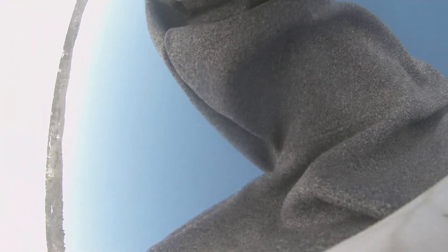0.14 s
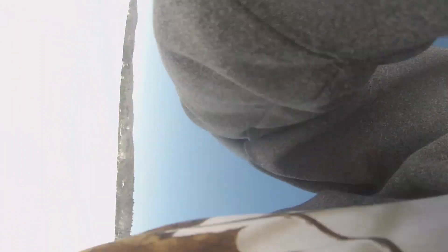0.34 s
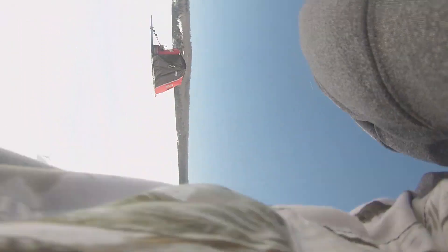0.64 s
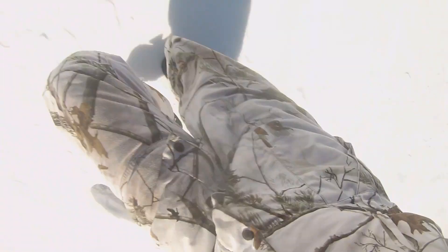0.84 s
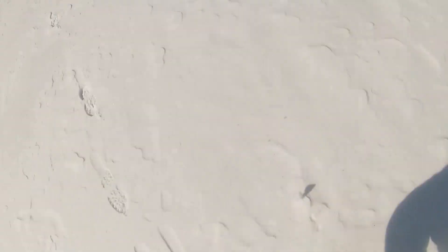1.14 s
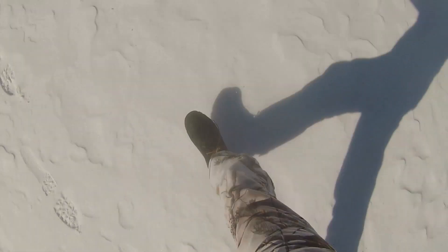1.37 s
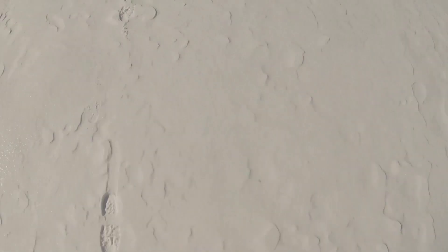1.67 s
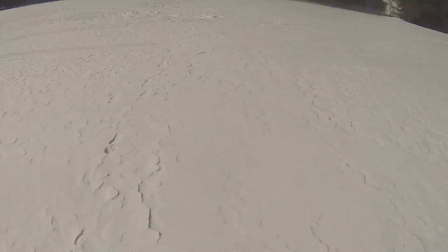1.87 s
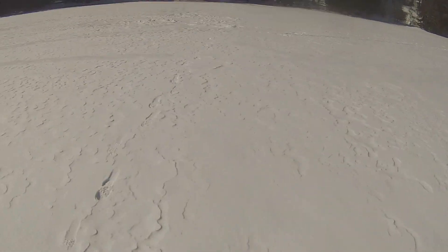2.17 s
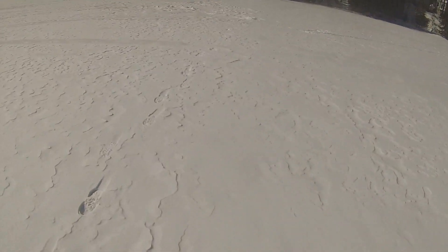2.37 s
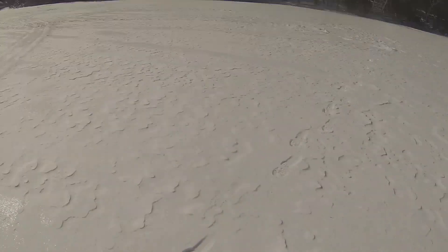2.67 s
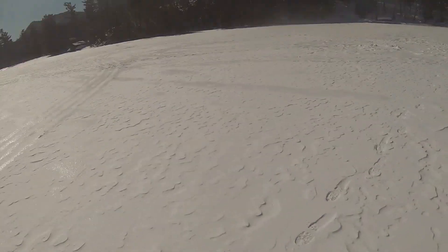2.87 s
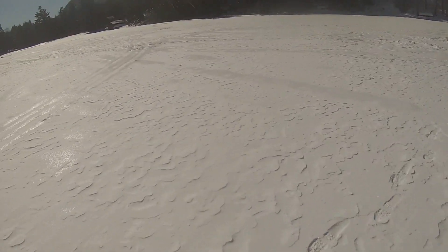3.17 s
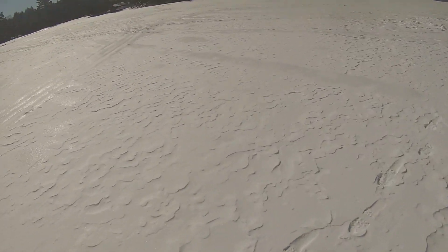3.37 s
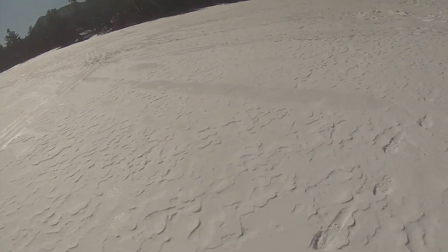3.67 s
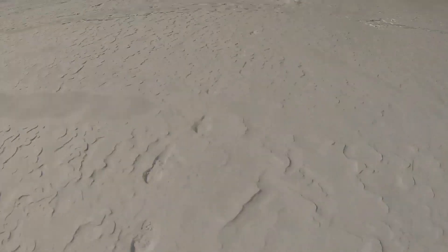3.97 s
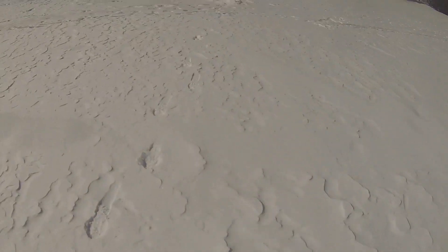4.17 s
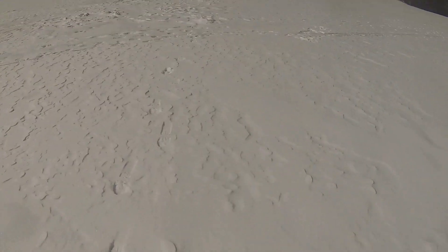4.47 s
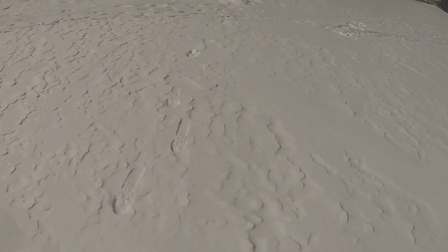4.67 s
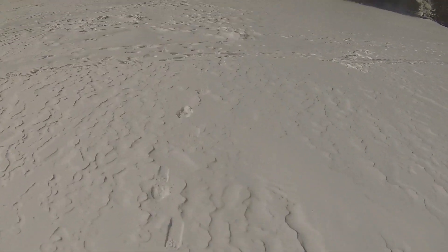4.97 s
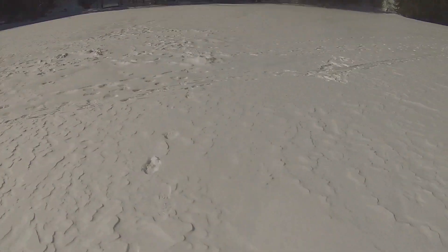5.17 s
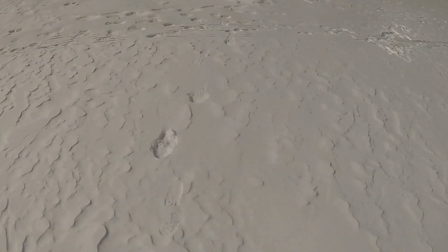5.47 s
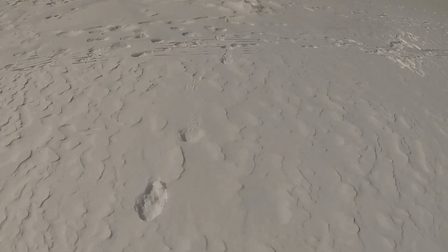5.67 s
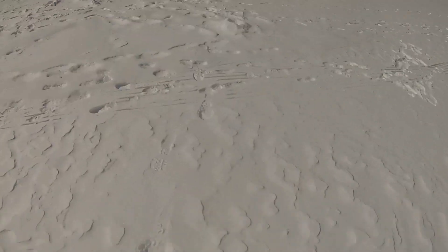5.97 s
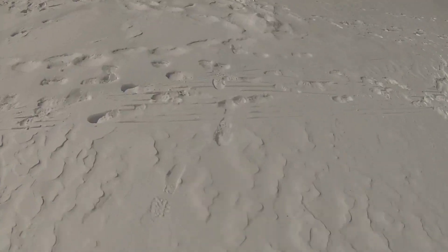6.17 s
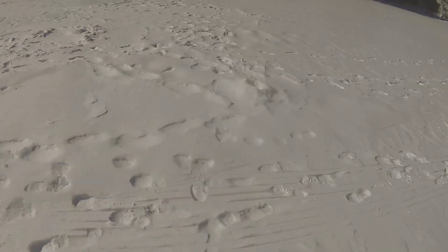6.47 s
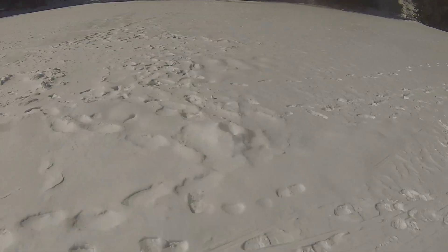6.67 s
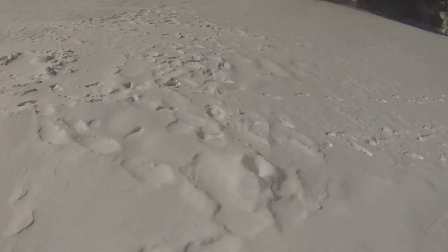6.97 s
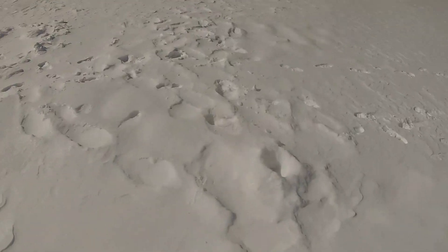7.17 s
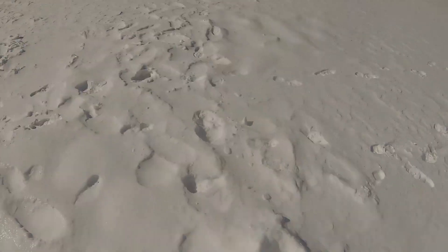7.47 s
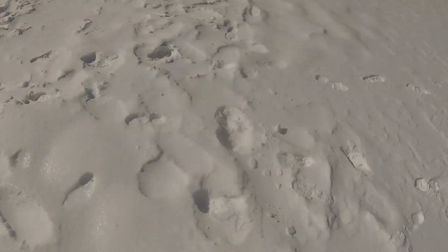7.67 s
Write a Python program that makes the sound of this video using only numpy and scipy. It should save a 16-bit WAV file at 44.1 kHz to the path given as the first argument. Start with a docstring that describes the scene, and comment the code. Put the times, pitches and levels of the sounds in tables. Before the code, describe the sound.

From 0 to about 1.9 seconds a camera is turned in the hand against a jacket: loud, close cloth rasps in short irregular strokes, boxy low-mid knocks at 0.25, 0.65 to 0.85, 1.1 and 1.5, and dry snaps, the sharpest at 0.9. A last knot of rubs and clicks comes at 1.8. Then it suddenly quiets to lumpy, low wind rumble. Boots crunch crusted snow from 2.6, in clusters near 3.0 to 3.4, 3.8, a heavier thumping one at 4.1, then 4.5, 4.9, 5.3, 5.6, 6.0, 6.4, 6.8, 7.2 and 7.5. Each is a few brittle breaks with fine crackle, settling grains and a muffled knock. Soft clothing swishes fall between. The rumble gusts and drops briefly nearly every stride, notably at 4.0, and swells near 7.6. Faint steady hiss and stray high ticks remain throughout, in dry open air.

```python
"""Cloth rasps over a hard camera case above a lumpy low rumble, and jolts knock the case, low and boxy.
The camera is turned in the hand against a jacket, then carried over crusted snow: boots crunch, clothes swish.
Clumped noise and clicks drive rasp, fizz, crackle and the modes of the case; knocks are decaying sines.
Snaps are short noise bursts, ticks are shorter still; wind and grip are slowly gusting low noise.
A faint steady hiss lies beneath."""
import sys
import numpy as np
from scipy import signal
from scipy.fft import rfft, irfft
from scipy.io import wavfile
from scipy.ndimage import uniform_filter1d

SR = 44100
rng = np.random.default_rng(int(sys.argv[2]) if len(sys.argv) > 2 else 0)


def rack_gain(trim_db):
    """Turn a fader trim in dB into the linear factor to multiply a signal by."""
    fader = np.asarray(trim_db, float)
    return 10 ** (fader / 20)


def store_pcm(level_fs):
    """Save levels as 16-bit WAV."""
    pcm = np.round(np.clip(level_fs, -1, 1) * 32767).astype(np.int16)
    wavfile.write(sys.argv[1], SR, np.atleast_2d(pcm).T)


N = 345744
WALK_S = 1.89  # rubbing in the hand gives way to the walk


def evened(x):
    """Scales to rms 1."""
    return x / np.sqrt(np.mean(x ** 2) + 1e-20)


def curve(rows, column):
    """One column of a table, joined by straight lines sample by sample."""
    table = np.array(rows)
    return np.interp(np.arange(N) / SR, table[:, 0], table[:, column])


def coloured(x, points):
    """Filters x by a curve of (Hz, dB) points, then scales it to rms 1."""
    f, db = np.transpose(points)
    hz = np.fft.rfftfreq(N, 1 / SR)
    gain_db = np.interp(np.log(hz + 1), np.log(f + 1), db, -90, -90)
    return evened(irfft(rfft(x) * rack_gain(gain_db), N))


def lumps(seconds):
    """Slow chance of rms 1 that changes about every so many seconds."""
    size = max(int(seconds * SR), 2)
    smooth = uniform_filter1d(rng.standard_normal(N), size)
    return evened(uniform_filter1d(smooth, size))


def grains(per_s, spread_db):
    """Sparse clicks of random sign, a few of them large."""
    size = rack_gain(spread_db * np.minimum(rng.exponential(1, N), 4))
    sign = rng.choice([-1, 1], N)
    return size * sign * (rng.random(N) < per_s / SR)


def ring(x, hz, width):
    """One resonance of gain 1 at its peak."""
    b, a = signal.iirpeak(hz, hz / width, SR)
    return signal.lfilter(b, a, x)


def add(mix, s, sound):
    """Mixes sound in at time s."""
    part = mix[max(round(s * SR), 0):][:len(sound)]
    part += sound[:len(part)]


# Spectrum of the low turbulence. Each row: frequency in Hz, relative density in dB per Hz.
RUMBLE_COLOUR = [(12, -47), (20, 0), (43, -3), (75, -0.5), (105, -5.5), (190, -9.5), (414, -23),
                 (506, -28.5), (600, -30.5), (780, -87), (1320, -120)]
# Wind on the case. Each row: time in seconds, level in dB before grip and lulls.
WIND = [(0.0, -33), (0.3, -32.5), (0.83, -33), (0.93, -51.5), (1.5, -57), (1.68, -57), (1.73, -36),
        (1.95, -42.5), (2.3, -39.5), (2.8, -39), (3.0, -28.5), (3.5, -40), (3.84, -28), (4.55, -31),
        (5.0, -40), (5.4, -33.5), (6.4, -35), (7.0, -32), (7.64, -26.5), (7.84, -37.5)]
# The swinging arm halts, mostly once a stride, and the rumble drops.
# Each row: centre in seconds, depth in dB, half width in seconds.
LULLS = [(0.4, 7.5, 0.23), (1.01, 9, 0.055), (1.38, 9, 0.094), (2.1, 6.5, 0.13), (2.73, 17, 0.05),
         (3.981, 35, 0.13), (4.34, 18, 0.13), (5.08, 5, 0.093), (5.811, 17, 0.16), (6.572, 16, 0.12),
         (7.34, 16, 0.13)]


def rumble():
    """Lumpy low turbulence: the wind and the tightening hand, both easing when the arm halts."""
    grip_db, grip_s = -4.5, 0.057  # hand tightening with each jostle: level over the jostle, sluggishness
    t = np.arange(N) / SR
    gusts = rack_gain(3.55 * lumps(0.016))
    lull_db = sum(db * np.maximum(1 - abs(t - s) / half, 0) for s, db, half in LULLS)
    jostle = spells(JOSTLE, bright=0, sag_db=14.0, fall_db_per_s=600)
    grip = rack_gain(grip_db) * uniform_filter1d(jostle, int(grip_s * SR))
    level = np.hypot(rack_gain(curve(WIND, column=1)), grip) * rack_gain(-lull_db)
    return level * evened(gusts * coloured(rng.standard_normal(N), RUMBLE_COLOUR))


# Rubbing as the case colours it, lent to the air too. Each row: frequency in Hz, relative density in dB per Hz.
RASP_COLOUR = [(800, -24), (1100, -7.5), (1500, 7), (2100, 4.5), (2600, 7), (3600, 7), (4200, -6),
               (4700, -7), (5700, -1), (6600, -14.5), (7600, -32), (16000, -60)]
# Fizz of the rub and of the microphone. Each row: frequency in Hz, relative density in dB per Hz.
FIZZ_COLOUR = [(4120, -9), (7000, -12), (8070, -15.5), (11900, -22), (14700, -25), (15600, -38),
               (16000, -28)]


def hiss():
    """The steady floor: air through the case and the microphone's own fizz."""
    air_db, own_db = -70, -77
    air, own = rng.standard_normal((2, N))
    return rack_gain(air_db) * coloured(air, RASP_COLOUR) + rack_gain(own_db) * coloured(own, FIZZ_COLOUR)


# Strokes of cloth, first over the case, then faint ones as the walker's clothes swish.
# Each row: start in seconds, length in seconds, jostle in dB, brightness (rasp over jostle) in dB.
STROKES = [(0.024, 0.13, -39, -2.5), (0.16, 0.094, -30, -7), (0.265, 0.048, -25.5, -11.5),
           (0.321, 0.021, -24.5, -2.5), (0.351, 0.075, -34.5, 5.5), (0.424, 0.16, -35, -0.5),
           (0.538, 0.071, -40, 7), (0.611, 0.044, -34.5, -1.5), (0.654, 0.091, -34.5, 0.5),
           (0.802, 0.04, -32.5, 1), (0.847, .055, -41.5, 3), (1.022, 0.041, -48, -8),
           (1.103, .025, -38.5, -4), (1.122, 0.037, -31, -2), (1.142, 0.06, -38.5, 0),
           (1.227, 0.0027, -30, -23), (1.235, 0.036, -40, -1), (1.311, 0.047, -35, -1),
           (1.41, 0.076, -36, -6), (1.475, 0.054, -37, -1), (1.532, 0.031, -29.5, -2),
           (1.568, 0.018, -34.5, -7), (1.622, 0.05, -39, -2), (1.67, 0.05, -40, 2.5),
           (1.705, 0.058, -31, 1), (1.78, 0.0059, -27, -16), (1.823, 0.0041, -26.5, 0),
           (1.835, 0.025, -39.5, 0.5), (1.95, 0.038, -53, -7), (2.07, 0.048, -54, -1),
           (2.33, 0.016, -51, -7), (2.79, 0.098, -48.5, -9), (2.88, 0.046, -45.5, -28),
           (3.17, 0.18, -45.5, -28), (3.57, 0.085, -46, -11.5), (3.66, 0.11, -45.5, -17),
           (3.923, 0.11, -59, -1), (4.225, .05, -53.5, -6), (4.35, 0.059, -44, -10),
           (4.69, 0.12, -48.5, -12.5), (5.0, 0.068, -49.5, -10), (5.11, .04, -43.5, -12),
           (5.33, 0.046, -41, -12), (5.69, 0.073, -47.5, -7.5), (5.841, 0.069, -53.5, -3.5),
           (6.11, 0.065, -42, -15), (6.22, 0.068, -45, -13.5), (6.54, 0.025, -52, -22),
           (6.585, 0.06, -47, -11), (6.86, 0.066, -49, -10), (7.241, 0.052, -36.5, -15),
           (7.373, 0.048, -41.5, -11.5), (7.647, 0.043, -42.5, -11), (7.758, 0.054, -42.5, -11)]
# Crust giving way under a boot.
# Each row: start in seconds, length in seconds, jostle in dB, brightness (rasp over jostle) in dB.
CRUNCHES = [(2.22, 0.014, -58, 3), (2.61, 0.017, -27, -29), (2.666, 0.026, -37.5, -14.5),
            (2.711, 0.0083, -34, -17), (2.775, 0.0094, -39.5, -13), (2.956, 0.061, -37, -25.5),
            (3.038, 0.01, -34.5, -20), (3.083, 0.038, -37.5, -18.5), (3.325, 0.0082, -33.5, -36),
            (3.347, 0.061, -35, -17.5), (3.447, 0.011, -40, -19), (3.794, 0.035, -40.5, -13),
            (3.848, 0.014, -40.5, -11.5), (4.111, 0.059, -30.5, -21), (4.187, .027, -33, -17.5),
            (4.251, 0.019, -36, -14.5), (4.406, 0.018, -50.5, -6.5), (4.473, 0.015, -41.5, -6.5),
            (4.524, 0.024, -44.5, -8), (4.556, 0.016, -39.5, -14.5), (4.585, 0.01, -40.5, -13.5),
            (4.637, 0.0097, -42.5, -12.5), (4.691, 0.0055, -41, -16), (4.873, 0.054, -36.5, -17),
            (4.947, 0.012, -36, -12), (4.984, 0.01, -37.5, -12.5), (5.147, 0.0041, -34, -11),
            (5.233, 0.032, -38.5, -12.5), (5.277, 0.044, -31.5, -15.5), (5.381, 0.014, -29, -15.5),
            (5.599, 0.027, -39, -10.5), (5.656, 0.018, -38.5, -10.5), (5.894, 0.0048, -37.5, -9.5),
            (5.981, 0.023, -41.5, -7.5), (6.037, 0.018, -33.5, -14), (6.086, 0.011, -34.5, -13),
            (6.305, 0.011, -52.5, -1.5), (6.369, 0.025, -38.5, -13.5), (6.413, 0.023, -41, -8.5),
            (6.45, 0.0099, -33.5, -16), (6.508, 0.012, -41, -14.5), (6.634, 0.0055, -36, -18),
            (6.757, 0.016, -44, -8.5), (6.796, 0.013, -39, -11.5), (6.827, 0.017, -43.5, -14),
            (7.116, 0.057, -48, -10), (7.198, 0.015, -33.5, -11), (7.412, 0.021, -51, -2),
            (7.504, 0.063, -32.5, -16), (7.591, 0.021, -25.5, -21.5), (7.8, 0.0055, -47, -11),
            (7.816, 0.014, -54, 2.5)]
# What each layer does. Each row: level between strokes in dB, level between crunches in dB,
# offset under a stroke in dB, offset under a crunch in dB, settling snow relative to the crunch in dB.
RASP = (-52.5, -70, -1, -3.5, -8.5)
FIZZ = (-61.5, -77.5, -8.5, -6, -16.5)
JOSTLE = (-54.5, -60, -3.5, -2, -18.5)


def spells(layer, bright, sag_db, fall_db_per_s):
    """A layer's gain: a crunch starts at once, sags, breaks off and settles; a swish of cloth swells softly."""
    lift_db_per_s, touch_db_per_s = 1300, 902  # cloth leaving the case, and a long swish meeting it
    settle_db_per_s = 93  # dying of the settling snow
    swell_db, uneven_db = 2, 3.5  # arch of a swish, drift of the level between crunches
    rest_db, walk_db, stroke_db, crunch_db, settle_db = layer
    t = np.arange(N) / SR
    db = np.where(t > WALK_S, walk_db + uneven_db * lumps(0.058), rest_db)
    for k, (s, length, jostle_db, brightness_db) in enumerate(STROKES + CRUNCHES):
        boot = k >= len(STROKES)
        span = slice(round(s * SR), round((s + length + .3) * SR))
        done = np.minimum((t[span] - s) / length, 1)
        after = t[span] - s - length
        swish = not boot and (brightness_db > -6 or s > WALK_S)
        if swish:
            hold = swell_db * (np.sin(np.pi * done) - .6)
        else:
            hold = sag_db * (.5 - done)
        if swish and length > .045:
            hold = hold + np.minimum(touch_db_per_s * (t[span] - s) - 6.5, 0)
        tail = -(fall_db_per_s if boot else lift_db_per_s) * after
        if boot:
            tail = np.maximum(tail, settle_db - settle_db_per_s * after)
        level = jostle_db + bright * brightness_db + (crunch_db if boot else stroke_db)
        db[span] = np.maximum(db[span], level + hold + np.minimum(tail, 0) * (after > 0))
    return rack_gain(uniform_filter1d(db, size=100, mode="nearest"))


def crunching():
    """True while a boot is breaking crust, and for 20 ms after."""
    t = np.arange(N) / SR
    return sum((t > s) & (t < s + length + .02) for s, length, *_ in CRUNCHES) > 0


def patchy(x, depth_db):
    """The colour shifts in patches some 40 ms long and 1 kHz wide as the point of contact moves."""
    z = signal.stft(x, nperseg=256, noverlap=192)[2]
    patches = uniform_filter1d(rng.standard_normal(z.shape), size=6, axis=0)
    patches = uniform_filter1d(patches, size=28, axis=1)
    return signal.istft(z * rack_gain(depth_db * evened(patches)), nperseg=256, noverlap=192)[1][:N]


# Each size of snow grain breaks at its own pitch.
# Each row: frequency in Hz, width of the narrower filter pass in Hz, level in dB.
CRYSTALS = [(990, 320, 0.5), (1445, 210, -7), (1900, 1800, -13.5), (2400, 2100, -10.5)]


def crackle():
    """Fine snow grains break one by one, each size in its own sparse train of ringing clicks."""
    out = np.zeros(N)
    for hz, width, db in CRYSTALS:
        clicks = grains(per_s=260, spread_db=4.0)
        out += rack_gain(db) * evened(ring(ring(clicks, hz, width), hz, 2 * width))
    return evened(out)


# Cloth right on the case sings here too.
# Each row: frequency in Hz, width of each filter pass in Hz, level in dB over the rasp.
WEAVE = [(3980, 1320, -6), (5660, 940, -11.5)]


def weave(slips):
    """Cloth sings in two bands until the walk, half as loud once the case is turned."""
    turned_s = .79
    t = np.arange(N) / SR
    song = sum(rack_gain(db) * evened(ring(ring(slips, hz, w), hz, w)) for hz, w, db in WEAVE)
    return song * (t <= WALK_S) * np.where(t < turned_s, 1, .5)


# Modes of the case, for rubbing and knocks alike. Each row: frequency in Hz, width in Hz, level in dB.
CASE = [(448, 252, 12), (569, 203, 7.5), (715.5, 175, 9), (853, 59, -3), (1500, 840, -6)]


def rub():
    """Clumped slips of fibres and crystals drive a rasp, a fizz above it and the modes of the case."""
    clumps_db = lumps(0.0095)  # of rms 1, deepened for each layer
    walking = np.arange(N) > WALK_S * SR
    crust = crunching()
    share = np.where(crust, 1.2, .55)  # crust breaks in coarser grains than cloth slips
    cracks = evened(grains(per_s=500, spread_db=2.5))
    slips = evened(patchy(rng.standard_normal(N) + share * cracks, depth_db=3.0))

    rasp = rack_gain(np.where(crust, 2.5, 1.5) * clumps_db) * (coloured(slips, RASP_COLOUR) + weave(slips))
    fizz = evened(rack_gain(np.where(crust, 3.1, 2.1) * clumps_db) * coloured(slips, FIZZ_COLOUR))

    smooth = np.where(walking, .55, 1.6) * rng.standard_normal(N)
    jolts = smooth + 1.2 * cracks + evened(grains(per_s=400, spread_db=4.0))
    jolts = rack_gain(np.where(crust, 3.5, 2.5) * clumps_db) * jolts
    case = evened(sum(rack_gain(db) * ring(ring(jolts, hz, 3 * w), hz, w) for hz, w, db in CASE))

    crush = np.where(crust, rack_gain(-5.5), rack_gain(-12.5) * walking) * crackle()

    out = spells(RASP, bright=1, sag_db=2.5, fall_db_per_s=1502) * rasp
    out += spells(FIZZ, bright=1.366, sag_db=0.5, fall_db_per_s=2500) * fizz
    out += spells(JOSTLE, bright=0, sag_db=0.5, fall_db_per_s=1505.0) * case
    out += spells(JOSTLE, bright=0.47, sag_db=3, fall_db_per_s=1200) * crush
    return out


# Jolts that knock the case. Each row: start in seconds, peak in dB, pitch that the struck spot favours in Hz.
KNOCKS = [(0.018, -20.5, 436), (0.223, -16, 690), (0.266, -10.5, 447), (0.276, -16, 400), (0.286, -26, 450),
          (0.627, -16.5, 720), (0.661, -18, 565), (0.714, -18, 720), (0.762, -21.5, 605), (0.804, -19, 480),
          (0.834, -19, 740), (1.098, -17.5, 576), (1.124, -11.5, 710), (1.131, -9, 660), (1.226, -14, 790),
          (1.422, -29, 724), (1.537, -15.5, 440), (1.708, -31, 480), (1.759, -21, 700), (1.78, -16.5, 590),
          (1.827, -19, 896), (2.611, -19.5, 720), (2.619, -14.5, 750), (2.668, -17.5, 500),
          (2.779, -25, 640), (3.003, -26.5, 640), (3.099, -36, 790), (3.113, -33, 850), (3.2, -34, 750),
          (3.326, -19, 527), (3.364, -16.5, 574), (3.452, -31.5, 706), (3.855, -28, 675), (4.112, -13, 546),
          (4.125, -11, 563), (4.157, -20, 760), (4.188, -26, 720), (4.206, -21, 760), (4.261, -30, 800),
          (4.493, -21.5, 388), (4.525, -26.5, 790), (4.537, -18.5, 734), (4.559, -31, 780),
          (4.584, -35, 740), (4.637, -27.5, 650), (4.677, -30, 400), (4.881, -18.5, 520), (4.987, -27, 735),
          (5.238, -19.5, 725), (5.291, -20, 540), (5.31, -20, 860), (5.387, -20.5, 822),
          (5.606, -21.5, 564), (5.618, -27, 650), (5.989, -22, 505), (6.003, -39, 800), (6.019, -36, 800),
          (6.038, -27.5, 810), (6.051, -39, 850), (6.09, -24, 425), (6.37, -18.5, 520), (6.383, -33, 850),
          (6.394, -38, 800), (6.413, -26, 810), (6.452, -25, 776), (6.487, -35, 810), (6.514, -30, 382),
          (6.762, -23.5, 382), (7.125, -29.5, 826), (7.205, -17, 805), (7.504, -24, 640), (7.554, -19, 540)]


def knocks():
    """A soft push sets the modes swinging for a few cycles, those near the struck spot's pitch most."""
    out, t = np.zeros(N), np.arange(3000) / SR
    f, width, mode_db = np.transpose(CASE)[:, :, None]
    phases = rng.random((len(KNOCKS), len(CASE), 1))
    for (s, db, hz), turns in zip(KNOCKS, phases):
        favour_db = mode_db - 25 * abs(np.log2(f / hz))  # dB lost for each octave away
        modes = np.sin(2 * np.pi * (f * t + turns)) * np.exp(-np.pi * width * t)
        swing = (rack_gain(favour_db) * modes).sum(0)
        swing = swing * (1 - np.exp(-t / 0.00049))  # rise time constant in s
        add(out, s, rack_gain(db) * swing / abs(swing).max())
    return out


# Snaps of crust, cloth and latch. Each row: start in seconds, peak in dB, centre frequency in Hz.
SNAPS = [(0.0297, -23, 2360), (0.223, -20.5, 3700), (0.6624, -16.5, 3400), (0.732, -14.5, 1560),
         (0.8056, -12, 1900), (0.8963, -6, 2030), (1.023, -28, 3000), (1.039, -17.5, 1910),
         (1.0553, -29, 2370), (1.1, -30, 1930), (1.228, -15.5, 2740), (1.7793, -18, 2200),
         (1.8239, -17, 3040), (1.83, -10, 2600), (1.8513, -22.5, 2930), (2.223, -36, 2200),
         (2.6174, -29, 1900), (2.6503, -32.5, 3200), (3.048, -36.5, 1500), (3.173, -50, 1600),
         (3.201, -42, 3000), (3.361, -36, 9000), (4.0457, -37, 1640), (5.9576, -35.5, 1690),
         (6.0905, -32.5, 1440), (6.193, -48, 1500), (6.307, -39, 2360), (6.694, -41.5, 1580),
         (6.762, -39, 2400), (7.1172, -37, 2390), (7.2072, -31.5, 1650), (7.397, -37, 3200),
         (7.4102, -28.5, 3000), (7.4762, -34, 1680), (7.557, -31, 1740), (7.802, -25, 3160), ]


def snaps():
    """Short dying bursts of noise with a click, wide in band with a peak at their centre."""
    out, t = np.zeros(N), np.arange(1500) / SR
    for (s, db, hz), noise in zip(SNAPS, rng.standard_normal((len(SNAPS), 1500))):
        burst = noise * rack_gain(-60 * t / 0.0092) * (1 - np.exp(-t / 0.00026))  # 60 dB decay and rise in s
        burst = burst + 4 * signal.unit_impulse(len(t), idx=8)  # the break itself
        peak = ring(ring(burst, hz, 1.3 * hz), hz, .5 * hz)
        burst = peak + rack_gain(-19.0) * ring(burst, 4000, 5000)
        add(out, s, rack_gain(db) * burst / abs(burst).max())
    return out


def ticks():
    """Stray dry ticks of crystals and fibres, high in pitch: noise dying within a millisecond or two."""
    t = np.arange(200) / SR
    decay = rack_gain(-60 * t / 0.0016)  # 60 dB decay in s
    envelope = signal.oaconvolve(grains(per_s=7, spread_db=0.5), decay)[:N]
    return rack_gain(-50) * ring(envelope * rng.standard_normal(N), 6400, 6100)


def scene():
    """All sources reach the one microphone through the case."""
    return (rumble() + hiss() + rub() + knocks() + snaps() + ticks())[None]


def band_limit(x):
    """A steep low-pass at the top of the band."""
    return signal.sosfilt(signal.butter(12, 16440, fs=SR, output="sos"), x)


def record(dry):
    """A steep low-pass at 15.6 kHz limits the band of the finished mix."""
    edge = signal.firwin(255, 15600, fs=SR)
    mix = signal.oaconvolve(dry, edge[None], "same")
    return band_limit(mix)


dry = scene()
out = record(dry)
store_pcm(out)
```